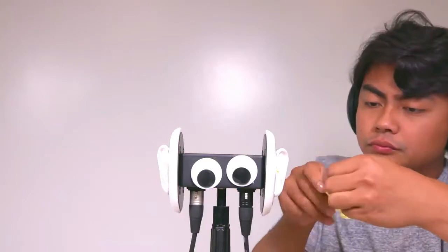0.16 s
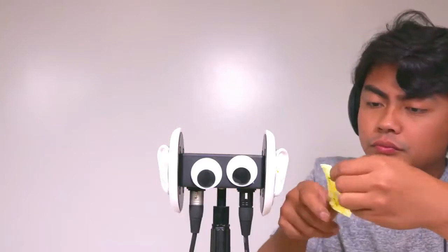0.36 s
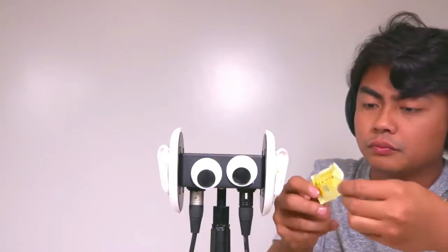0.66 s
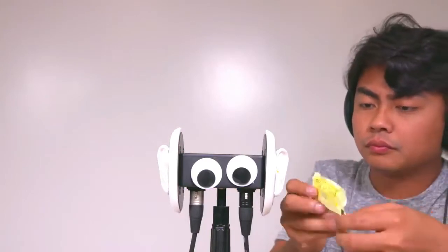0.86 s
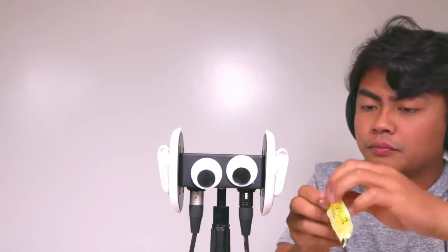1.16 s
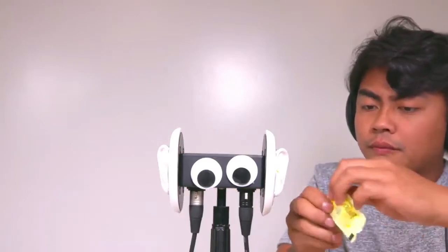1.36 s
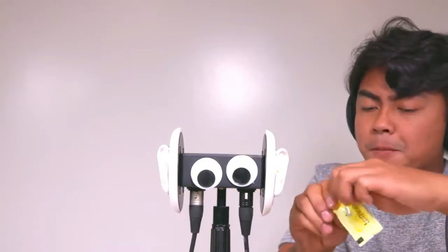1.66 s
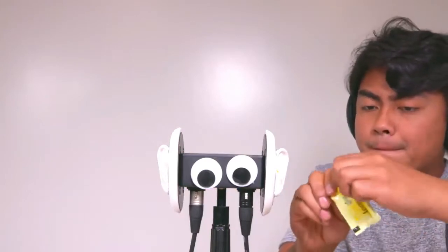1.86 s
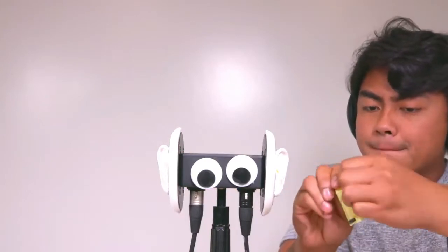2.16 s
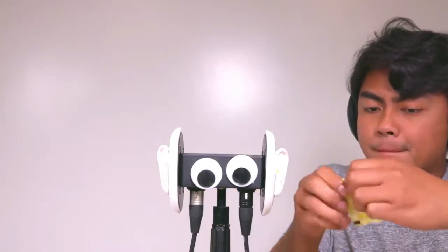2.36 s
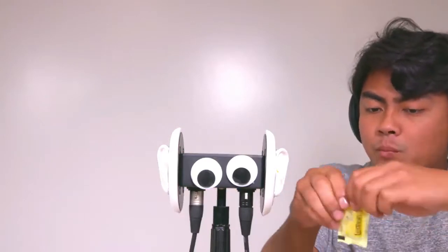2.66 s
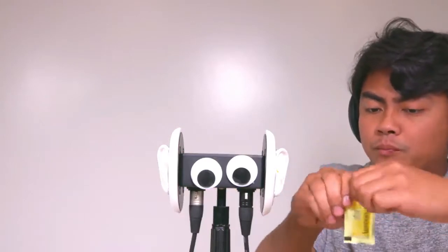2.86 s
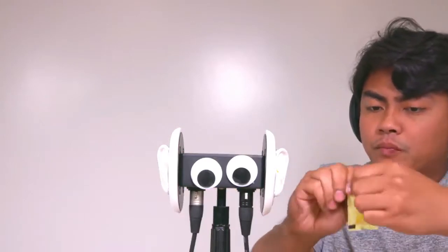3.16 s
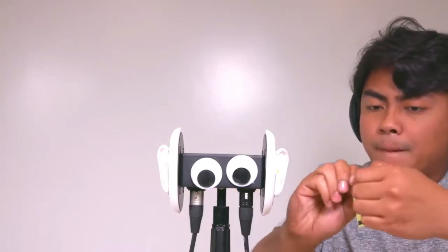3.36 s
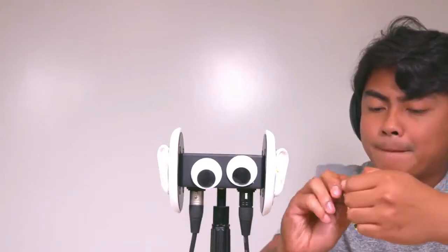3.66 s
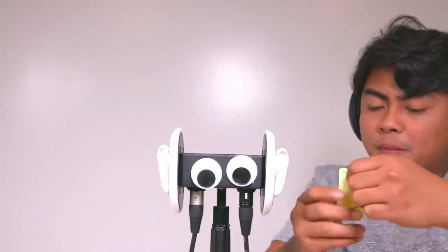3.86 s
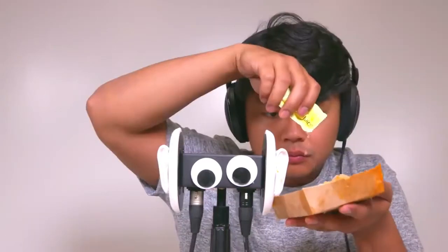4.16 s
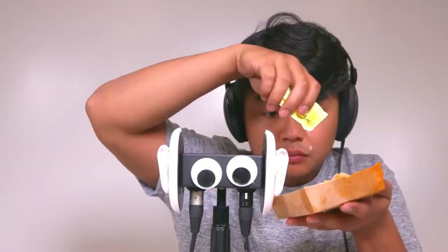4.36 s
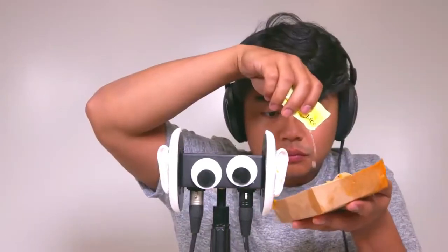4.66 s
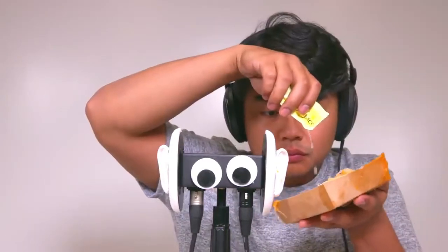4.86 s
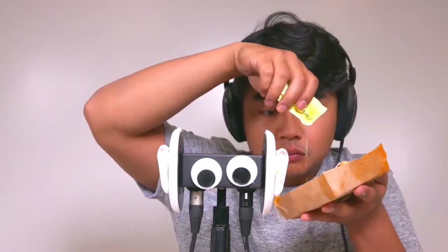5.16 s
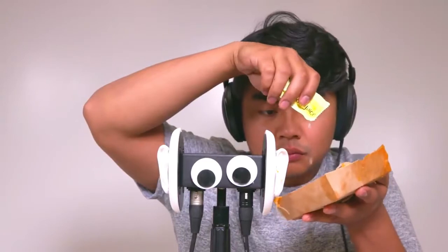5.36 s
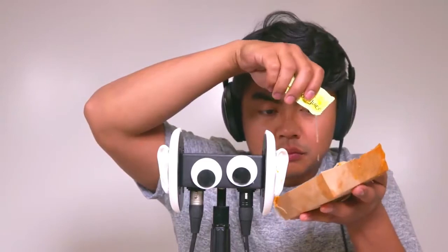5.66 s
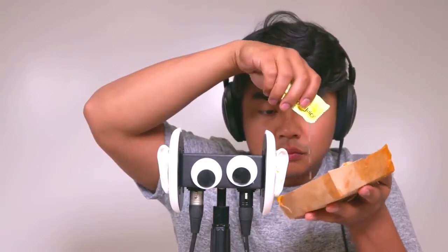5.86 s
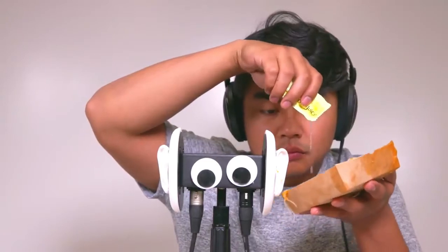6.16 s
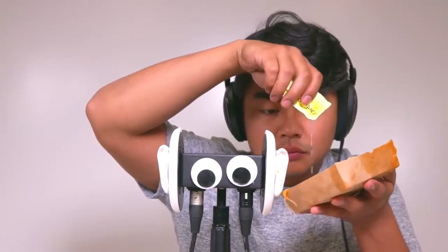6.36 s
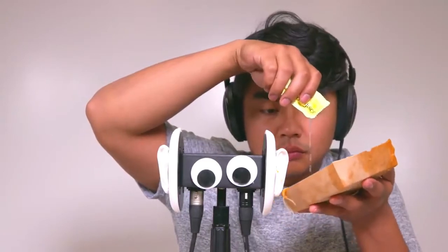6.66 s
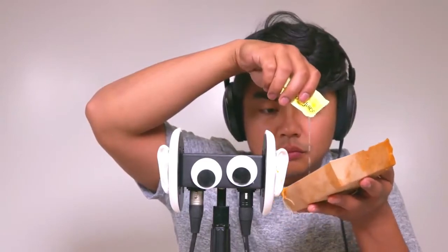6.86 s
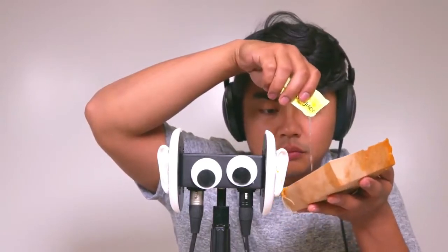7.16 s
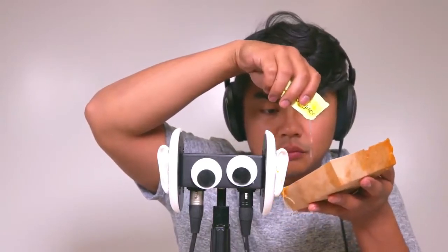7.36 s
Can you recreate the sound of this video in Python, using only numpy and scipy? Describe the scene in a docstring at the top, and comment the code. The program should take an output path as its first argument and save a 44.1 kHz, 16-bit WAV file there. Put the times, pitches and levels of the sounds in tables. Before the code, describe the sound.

Close binaural crackles of a small sachet being torn and fiddled with on the left, followed by quieter dull squeezing ticks over low rumble.

```python
"""Foil packet at the left ear

A small foil packet is crumpled, torn and squeezed close to the left ear of a dummy-head microphone.
Creases snap as band-split clicks, the grip creaks in runs of ticks, fingers drag over the film as dense
micro-slips, and one puff thumps the ear. The right ear gets a later, filtered copy past the head.
Noise tails make a small room, shaped noise the rumble and hiss. Midway the room's ring is cut short."""
import sys
import numpy as np
from scipy import signal
from scipy.fft import rfft, irfft, next_fast_len
from scipy.io import wavfile
from scipy.ndimage import uniform_filter1d

SR = 44100
rng = np.random.default_rng(int(sys.argv[2]) if len(sys.argv) > 2 else 0)


def linear_from_db(decibels):
    """Turn decibels (scalar or array-like) into linear amplitude factors; 0 gives 1."""
    return 10 ** (np.asarray(decibels, float) / 20)


def file_out(sig):
    """Save sig as 16-bit WAV at sys.argv[1]."""
    # one column per channel
    cols = np.atleast_2d(sig).T
    # limit, then scale
    lim = np.clip(cols, -1, 1)
    pcm = np.round(lim * 32767).astype(np.int16)
    wavfile.write(sys.argv[1], SR, pcm)


N = 331632

# spectrum of the rumble and hiss: (frequency [Hz], relative density [dB per Hz])
TONE_COLOUR = [(2.4, -29.5), (4.0, 4.5), (19, 0.5), (30, -14.5), (44, -11.5), (91, -20.5), (216, -34.5),
               (266, -30), (306, -34), (498, -36.5), (552, -41), (781, -40.5), (1510, -44), (5460, -53),
               (16000, -62)]
# how much of the room tone the ears share: (frequency [Hz], likeness [0-1])
EAR_LIKENESS = [(60, 0.87), (290, 0.8), (640, 0), (3000, 0)]
# hands shifting their grip: (time [s], peak level [dB], half length [s])
GRIP_BUMPS = [(0.204, -67, 0.017), (0.364, -39.5, 0.03), (0.576, -48.5, 0.017), (0.98, -52.5, 0.08),
              (2.287, -48.5, 0.013), (4.166, -57, 0.0089), (5.159, -46, 0.036), (5.383, -52, 0.037),
              (5.811, -51.5, 0.0093)]
# decay of the room: (frequency [Hz], time to fall 60 dB [s], starting gain [dB])
ROOM_DECAY = [(282, 0.53, -41.5), (696, 1, -57.5), (1590, 0.5, -48), (3000, 0.55, -53.5), (5700, 0.44, -46),
              (10130, 0.33, -45)]
# the head in the way of the far ear: (frequency [Hz], gain [dB])
HEAD_SHADOW = [(100, 6), (400, -24), (1500, -13.5), (4000, -24), (9000, -29), (15000, -29)]
# spectrum of the film under the fingers: (frequency [Hz], relative density [dB per Hz])
FILM_COLOUR = [(59, -40), (100, -9), (442, -6), (1130, -2.5), (2320, -3), (3190, -5.5), (3940, -6),
               (4470, -4), (6020, -12.5), (7940, -11.5), (14100, -19), (16000, -21)]
# faint rustle of the film in the hands: (time [s], level of the middle [dB])
RUSTLE_LEVEL = [(.1, -76), (.45, -60), (.6, -60), (1.02, -52), (1.2, -64.5), (1.68, -52.5), (1.9, -65),
                (2.49, -63.5), (2.85, -51), (2.95, -54), (3.46, -55.5), (3.65, -67.5), (3.98, -65),
                (5.2, -64.5), (6.25, -129), (6.29, -47.5), (6.55, -74), (7.52, -102.5)]
# the film ripping along the seam: (time [s], level of the middle [dB])
TEAR_LEVEL = [(.344, -48.5), (.354, -10), (.364, -39), (.378, -29.5), (.388, -38.5), (.399, -30),
              (.411, -29.5), (.426, -22), (.442, -61.5)]
# fingers dragging over the film:
# (time [s], length [s], level of the middle [dB], low part [dB re middle], high part [dB re middle])
FINGER_STROKES = [(0.166, 0.071, -37.5, -12, 2.5), (0.2, 0.027, -22, -5, -11.5),
                  (0.236, 0.014, -27, 4.5, 2), (0.311, 0.029, -19.5, -5.5, -3),
                  (0.57, 0.23, -52.5, -33, -4.5), (0.799, 0.023, -28, -6, -9), (0.834, 0.069, -52.5, -5, 2),
                  (0.929, 0.086, -45, 10.5, -1.5), (0.965, 0.046, -53, 8, -9.5),
                  (1.266, 0.035, -46.5, 7.5, -9.5), (1.313, 0.05, -46.5, 9, 5),
                  (1.585, 0.099, -44.5, -22, 0.5), (2.366, 0.11, -54, -26, -5),
                  (2.458, 0.029, -16.5, -25, -5), (2.635, 0.16, -53, -13, -6), (2.727, 0.04, -42, -8, -1),
                  (2.707, 0.14, -45.5, -10.5, -18.5), (3.24, 0.053, -48.5, -0.5, -12),
                  (3.449, 0.018, -32, 0, -7), (3.749, 0.11, -52.5, -9, -11), (3.83, 0.091, -51, -16, 0),
                  (3.888, 0.03, -27.5, -4.5, -4.5), (4.019, 0.054, -42, -23, -20),
                  (4.172, 0.021, -53, -13, -15), (4.256, 0.06, -64, -12, 4), (4.659, 0.086, -49, 0, 0),
                  (4.781, 0.11, -51, -4.5, -2), (4.872, 0.11, -44, -6.5, -4),
                  (5.029, 0.065, -42.5, -4.5, -4), (5.122, 0.066, -49, 10.5, -14),
                  (5.202, 0.02, -61, 14, -10), (5.791, 0.035, -61.5, 13.5, -11),
                  (5.884, 0.084, -53, -7, 0.5), (6.365, 0.17, -56.5, -10, -15), (6.788, 0.011, -48, 5, 0.5),
                  (7.097, 0.03, -51.5, 3, 8), (7.44, 0.04, -57, -7, -2.5)]
# the squeezing grip sticks and slips in runs of dull ticks:
# (first tick [s], length [s], rate [ticks per s], ring [dB], thud [dB])
CREAK_RUNS = [(4.174, .13, 30, -61.5, -75), (5.598, .06, 67, -59.5, -80), (6.057, .03, 31, -67.5, -87),
              (6.16, .1, 52, -59.5, -56.5), (6.29, .19, 33.2, -46, -48), (6.544, .09, 45, -50, -50.5),
              (6.653, .2, 37.3, -51, -50.5), (6.855, .05, 41, -45.5, -48.5),
              (7.05, .06, 50.4, -55.5, -48.5), (7.154, .225, 43, -59, -50),
              (7.396, .12, 45.5, -58.5, -49.5)]
# creases snapping, energy as a level over 9 ms:
# (time [s], ring [dB], ring pitch [Hz], body [dB re ring], air [dB re ring])
CREASE_SNAPS = [(0.084, -60.5, 3000, 6.5, -22), (0.1118, -39, 3780, 4.5, -24),
                (0.1331, -43, 2450, 3.5, -21), (0.1552, -52.5, 3470, -15, 3), (0.186, -44, 3500, -0.5, 7),
                (0.2154, -29, 3600, -6.5, -9.5), (0.2481, -34, 5100, 0.5, -4),
                (0.2776, -35, 4140, -9.5, -17.5), (0.305, -18.5, 4600, -5.5, -1),
                (0.3085, -32.5, 4010, 2.5, -17), (0.3249, -23.5, 3360, -13, -9.5),
                (0.345, -15.5, 3400, -11.5, -8), (0.3543, -21.5, 3790, -12, -6), (0.382, -30, 4170, -12, 0),
                (0.6207, -42.5, 3900, -7, -20), (0.7899, -44.5, 3230, -9.5, -21),
                (0.8089, -34, 2860, -14, -11.5), (0.8148, -25, 4000, -4, -17),
                (0.9328, -38.5, 3260, -2.5, -30), (0.9441, -38, 5230, -18.5, -4.5),
                (0.9538, -22.5, 4570, 0.5, -19.5), (0.9854, -21, 3850, -12, -12.5),
                (1.264, -45.5, 3820, -6, -27), (1.275, -49, 3500, 2, -4), (1.2813, -39, 3380, -7.5, -25),
                (1.2924, -40, 3770, -11, -20), (1.334, -40, 3750, -16.5, -18.5),
                (1.3403, -26.5, 3720, -5.5, -2), (1.3551, -35, 3380, 0, -30.5),
                (1.4047, -35.5, 3700, -15.5, -19), (1.4493, -24, 2680, 4, -10),
                (1.5524, -38, 2650, 6.5, -41), (1.6052, -19.5, 3500, -9.5, -14.5),
                (1.62, -32.5, 3340, -10, -20), (1.6461, -38.5, 3950, -1, -18.5),
                (1.66, -32.5, 4150, -7.5, -8.5), (1.8043, -57.5, 4800, 6.5, -6),
                (1.8992, -45.5, 3340, 5.5, -39), (2.061, -28, 2540, -15.5, -16.5),
                (2.1545, -54, 2500, 2, -28), (2.1943, -51.5, 2500, 10, -30), (2.2491, -30, 4130, -10, -10),
                (2.391, -47, 4560, -8.5, -11), (2.464, -36.5, 4150, -19, -14),
                (2.4718, -19.5, 4440, -9, -7), (2.5994, -24, 3260, -12.5, -31),
                (2.617, -41, 4460, -8.5, -13.5), (2.662, -45, 4150, 1, 2.5), (2.7026, -38.5, 3600, 3, -35),
                (2.7867, -34.5, 2750, 1, -32.5), (2.9633, -23.5, 3700, -12.5, -15),
                (3.0493, -29, 4550, -8, -27.5), (3.0765, -44.5, 2500, 1, -38),
                (3.0882, -35, 3200, -10, -15), (3.143, -19.5, 4840, -19, -16), (3.231, -42, 2500, 6, -30),
                (3.2402, -31, 3820, -1, -5), (3.2677, -37.5, 3420, -22, -9.5), (3.2782, -38, 3500, -3, -15),
                (3.2993, -33.5, 3500, -2, -18), (3.4003, -45, 2900, -36, -5), (3.4317, -30, 3560, -15, -17),
                (3.4541, -27, 3940, -4.5, -25), (3.5654, -36, 2500, -15.5, -19.5),
                (3.8, -38, 3540, -5.5, -36), (3.8765, -27.5, 3900, -1, -3.5), (3.9088, -23, 3190, -6, -17),
                (4.0281, -47, 4500, -1.5, -14), (4.3317, -48.5, 5220, -10, -13),
                (4.6824, -51, 2500, 8, -27), (5.1147, -48.5, 8600, -38, 7), (5.267, -55.5, 4400, 0, -22),
                (5.332, -50, 2600, 5, -18), (5.3553, -53, 2600, 3, -12), (5.3736, -49, 2600, 6, -19),
                (5.386, -47, 2730, 6.5, -7), (5.3977, -40, 2780, 1.5, -19), (5.4254, -52, 3500, 1.5, -16),
                (5.722, -41, 2530, -9, -25), (5.8911, -62, 3200, -7.5, 13.5),
                (5.9127, -48.5, 4500, -8, -23), (6.26, -41, 4500, 3, -13.5),
                (6.2698, -19.5, 3600, -26.5, -4.5), (6.2707, -21.5, 6470, -24, -11),
                (6.402, -53.5, 3500, -4, 4), (6.4273, -50, 3540, 8, -2), (6.4352, -26.5, 7800, -15, -16.5),
                (6.565, -41, 4550, -2.5, -19), (6.5847, -39, 4500, -10, -25),
                (6.591, -33.5, 4220, -7, -10.5), (6.6886, -39, 4480, -3, -8), (6.7426, -53, 4550, -7, -18),
                (6.799, -36, 4550, -18, -10.5), (6.8554, -56, 4550, -14, -12),
                (6.9479, -34.5, 7050, -33, -16), (7.0312, -45.5, 4580, -4, -11), (7.277, -65, 4700, 1, -11),
                (7.3504, -56, 3500, -6, -5), (7.432, -55, 4850, -20, -13),
                (7.4685, -62.5, 4700, -10, -10.5)]
# thud, body, skirt, edge and air of a snap, one row each: (low edge [Hz], high edge [Hz])
CLICK_BANDS = [(330, 780), (1050, 2300), (2600, 5500), (5500, 8300), (8700, 11500)]
# the band above the air, which follows its level: (low edge [Hz], high edge [Hz])
TOP_EDGES = (11500, 15800)

CUT_S = 3.955  # the room's ring stops short here; after it the packet sounds drier and further round the left
HEAD_LAG = 27  # samples by which the far ear hears later, before the cut


def on_axis(table, hz):
    """Read a (frequency, value) table on a log-frequency axis."""
    f, v = np.transpose(table)
    return np.interp(np.log(hz + 1e-9), np.log(f), v)


def shape(x, gain_at):
    """Filter by a gain that is a function of frequency."""
    n = next_fast_len(x.shape[-1])
    spectrum = rfft(x, n) * gain_at(np.fft.rfftfreq(n, 1 / SR))
    return irfft(spectrum, n)[..., :x.shape[-1]]


def unit(x):
    """Scale to rms 1."""
    return x / np.sqrt(np.mean(x ** 2))


def band(x, lo_hz, hi_hz):
    """Causal band-pass."""
    sos = signal.butter(2, [lo_hz, min(hi_hz, .45 * SR)], "band", fs=SR, output="sos")
    return signal.sosfilt(sos, x)


def room_tone(level_db=-41, right_db=-2.5):
    """Deep rumble largely shared by both ears, hiss separate in each; a little louder on the left."""
    def colour(hz):
        return linear_from_db(on_axis(TONE_COLOUR, hz))

    def likeness(hz):
        return np.clip(on_axis(EAR_LIKENESS, hz), 0, 1)

    mid, side = rng.standard_normal((2, N))
    mid = shape(mid, lambda hz: colour(hz) * np.sqrt(1 + likeness(hz)))
    side = shape(side, lambda hz: colour(hz) * np.sqrt(1 - likeness(hz)))
    return linear_from_db(level_db) * unit(np.array([mid + side, linear_from_db(right_db) * (mid - side)]))


def room(x):
    """Diffuse noise tail, unrelated in the two ears, each band fading at its own rate."""
    t = np.arange(SR // 2) / SR
    tail = 0
    for hz, t60, db in ROOM_DECAY:
        noise = band(rng.standard_normal((2, len(t))), hz / 1.94, hz * 1.49)
        tail = tail + linear_from_db(db - 60 * t / t60) * noise
    tail = tail * np.clip((t - .002) / 0.0013, 0, 1)  # the tail sets in after 2 ms
    return signal.fftconvolve(x, tail[None], axes=2)[..., :N]


def bumps(lo_hz=110, hi_hz=450):
    """Soft low bumps of the hands shifting their grip: swells of low noise."""
    t = np.arange(N) / SR
    swell = sum(linear_from_db(db) * np.exp(-((t - s) / width) ** 2) for s, db, width in GRIP_BUMPS)
    return swell * unit(band(rng.standard_normal(N), lo_hz, hi_hz))


def thump(start_s=3.24, db=-11, hz=66.0, decay_s=0.0056, rise_s=0.0016):
    """A puff of air pulls the near ear's membrane, which swings back once."""
    t = np.clip(np.arange(N) / SR - start_s, 0, None)
    envelope = np.exp(-t / decay_s) * (1 - np.exp(-t / rise_s))
    return -linear_from_db(db) * envelope * np.cos(2 * np.pi * hz * t)


def wander(db):
    """Slow random gain as the film bends; db is the rms swing."""
    drift = uniform_filter1d(uniform_filter1d(rng.standard_normal(N), 700), 700)
    return linear_from_db(db * unit(drift))


def level_curve(table):
    """Gain drawn from a (time, level) table, inaudible outside it."""
    return linear_from_db(np.interp(np.arange(N) / SR, *np.transpose(table), left=-120, right=-120))


def rub(slips_per_s=5000, edge_share=0.65, edge_s=0.031):
    """Dense micro-slips of uneven size make the rustle, the rip and the strokes; the film's colour wanders."""
    size_db = 2.46 * np.minimum(rng.exponential(size=N), 4.5)
    slips = (rng.random(N) < slips_per_s / SR) * linear_from_db(size_db) * rng.standard_normal(N)
    drag = unit(slips) + 0.58 * rng.standard_normal(N)
    drag = shape(drag, lambda hz: linear_from_db(on_axis(FILM_COLOUR, hz)))
    # neighbouring bands meet in opposite phase
    low = -unit(band(drag, 120, 2500)) * wander(-0.96)
    mid = unit(band(drag, 2500, 5800)) * wander(0.66)
    high = -unit(band(drag, 5800, 16000)) * wander(1.5)
    flutter = linear_from_db(2.1 * unit(uniform_filter1d(rng.standard_normal(N), 150)))

    tear = level_curve(TEAR_LEVEL) * (mid + linear_from_db(-8) * low + linear_from_db(-11.5) * high)
    rustle = level_curve(RUSTLE_LEVEL) * (mid + linear_from_db(-3.5) * low + linear_from_db(-12.5) * high)
    out = tear + rustle
    for s, length, db, low_db, high_db in FINGER_STROKES:
        a, b = int(s * SR), min(int((s + length) * SR), N)
        u = np.arange(b - a) / SR
        to_edge = np.minimum(u, length - u)
        swell = np.clip(to_edge / min(edge_share * length, edge_s), 0, 1) ** 1.18
        stroke = mid[a:b] + linear_from_db(low_db) * low[a:b] + linear_from_db(high_db) * high[a:b]
        out[a:b] += linear_from_db(db) * swell * stroke
    return out * flutter


def snap_rows(s, hz, db, body_db, air_db):
    """Rows of creases() for snaps: the louder the snap, the weaker its thud against the ring."""
    thud_db = -18 - 0.66 * (db + 40)
    thud_db = thud_db + 4.5 * (s > CUT_S)  # the full packet, squeezed after the cut, thuds more
    skirt_db, edge_db = np.full_like(s, -3.5), np.full_like(s, -13.5)
    return np.column_stack([s, hz, db, thud_db, body_db, skirt_db, edge_db, air_db])


def creases():
    """List the snaps, a smaller follower soon after each, and the stick-slip ticks of the grip.

    Rows: (time [s], ring pitch [Hz], ring [dB], thud, body, skirt, edge, air [dB re ring])."""
    s, db, hz, body_db, air_db = np.transpose(CREASE_SNAPS)
    follower = snap_rows(s, hz, -60 + 0.5 * (db + 40), body_db, air_db)
    chance = rng.standard_normal(follower.shape)
    chance[:, 0] = np.abs(chance[:, 0])  # always later than its snap
    follower = follower + chance * [.025, 400, 0.5, *[4.5] * 5]  # scatter in s, Hz, dB, dB of colour
    rows = [snap_rows(s, hz, db, body_db, air_db), follower]

    k = np.arange(32)
    for first, length, rate, ring_db, thud_db in CREAK_RUNS:
        tick = [4550, ring_db, thud_db, -4, -3.5, -9.5, -9]  # Hz, dB, dB, then colour in dB re ring
        run = np.column_stack([first + k / rate, np.tile(tick, (len(k), 1))])
        run = run + rng.standard_normal(run.shape) * [.0025, 400, 4, *[3] * 5]  # s, Hz, dB, dB
        run[:, 3] -= run[:, 2]  # thud against the ring
        rows.append(run[k / rate < length])
    rows = np.vstack(rows)
    return rows[rows[:, 0] < N / SR]


def snaps(decay_s=0.0012, longer=0.0036, kick=2.83, top_db=-13, ring_width=1.114, blur=1.175):
    """A crease flips: one kick, then a millisecond rattle of the film, slightly longer in the loud ones.

    Returns the click at the near ear and what the room hears of it."""
    size = 512
    near, around = np.zeros((2, N + size))
    t = np.arange(size) / SR
    impulse = 1. * (t == 0)
    flat = [unit(band(impulse, *hz)) for hz in CLICK_BANDS]
    join = np.array([1, 1, -1, 1, -1, 1])  # neighbouring bands meet in opposite phase
    for s, ring_hz, db, *parts_db in creases():
        rattle_s = decay_s * np.exp(longer * (db + 48.0))
        push = rng.standard_normal(size) * np.exp(-t / rattle_s)
        push[0] = kick
        lo_hz, hi_hz = ring_hz / ring_width, ring_hz * ring_width
        ring = unit(band(push, lo_hz, hi_hz))
        thud = flat[0]  # answers the kick alone
        body, skirt, edge, air = [unit(band(push, *hz)) for hz in CLICK_BANDS[1:]]
        air = air - linear_from_db(top_db) * unit(band(push, *TOP_EDGES))
        gains = join * linear_from_db(db + np.array([0, *parts_db]))
        gains = gains * np.sqrt(.009 * SR / size)  # levels count the energy over 9 ms
        i = int(s * SR)
        near[i:i + size] += gains @ [ring, thud, body, skirt, edge, air]
        # averaged over all directions, the room hears the same balance without the rattle's ripples
        smooth_ring = unit(band(impulse, lo_hz / blur, hi_hz * blur))
        around[i:i + size] += gains @ [smooth_ring, *flat]
    return near[:N], around[:N]


def scene():
    """The packet reaches the left ear first; round the head it comes later, weaker and duller."""
    t = np.arange(N) / SR
    late = t >= CUT_S
    click, click_around = snaps()
    drag = rub()
    near, around = click + drag, click_around + drag
    # after the cut the packet sits closer and further round the left side
    lagged = np.roll(near, HEAD_LAG)
    lagged_more = linear_from_db(-7.0) * np.roll(near, HEAD_LAG + 4)
    far = shape(np.where(late, lagged_more, lagged), lambda hz: linear_from_db(on_axis(HEAD_SHADOW, hz)))

    before, after = room(np.array([[around * ~late], [around * late]]))
    fade = np.clip((CUT_S - t) / 0.02, 0, 1)  # the earlier ring is gone by the cut
    ring = before * fade + linear_from_db(-6.0) * after
    ear_gain = linear_from_db(np.array([[0], [-9]]))  # the bumps are weaker on the right
    return np.array([near + thump(), far]) + ring + room_tone() + bumps() * ear_gain


def top_cut(x):
    """Nothing passes above the cut-off."""
    return signal.sosfilt(signal.butter(12, 16370, fs=SR, output="sos"), x)


def record(dry):
    """Peaks beyond full scale are clipped."""
    mix = np.clip(dry, -1, 1)
    return top_cut(mix)


dry = scene()
out = record(dry)
file_out(out)
```